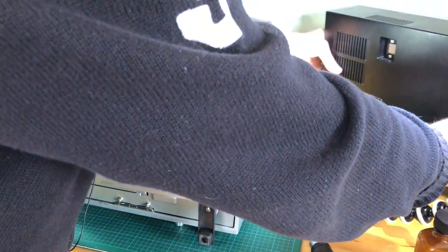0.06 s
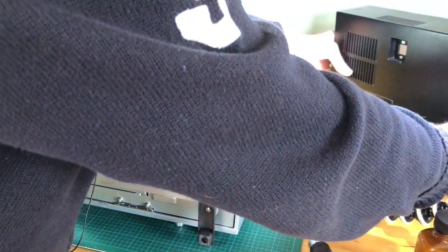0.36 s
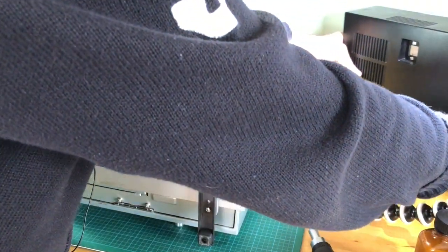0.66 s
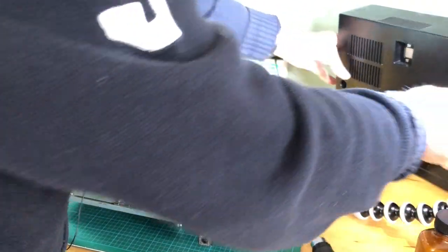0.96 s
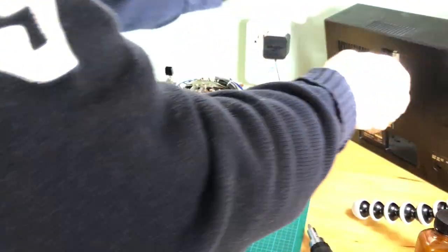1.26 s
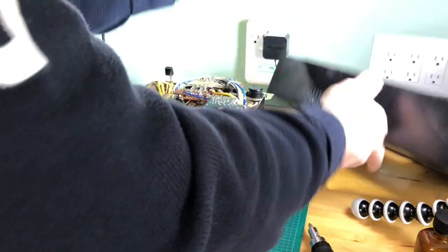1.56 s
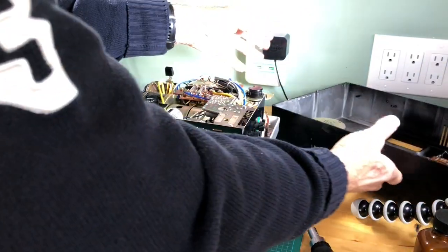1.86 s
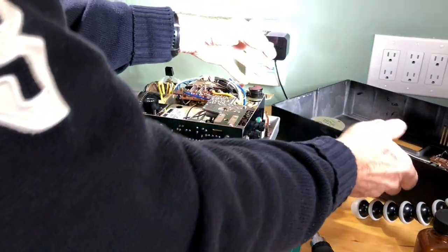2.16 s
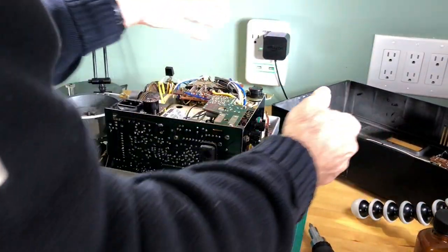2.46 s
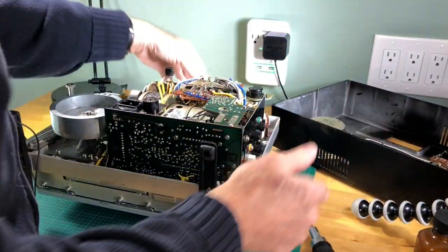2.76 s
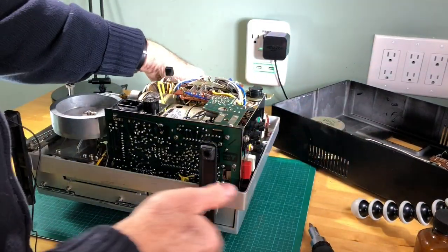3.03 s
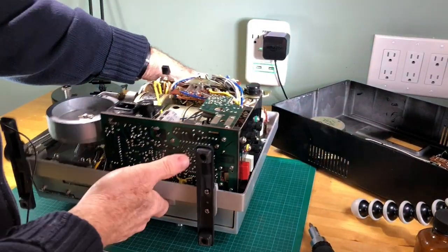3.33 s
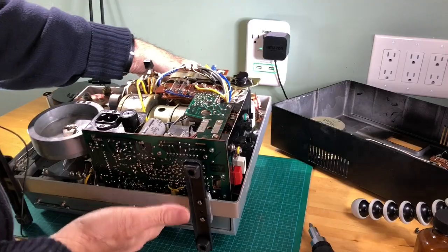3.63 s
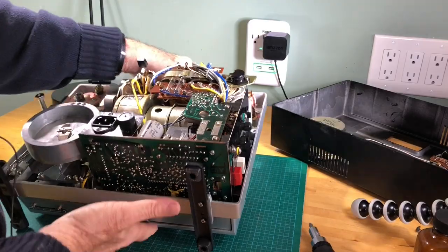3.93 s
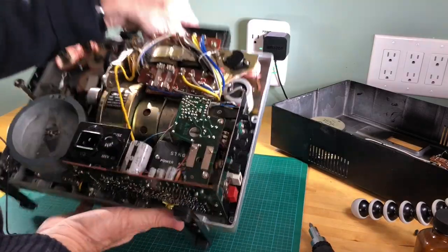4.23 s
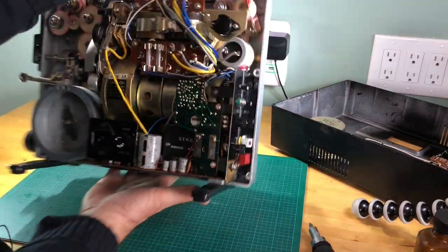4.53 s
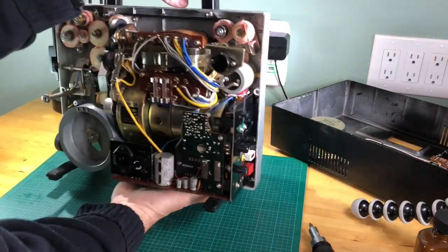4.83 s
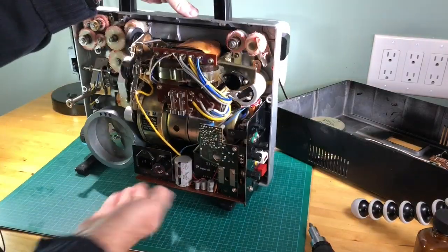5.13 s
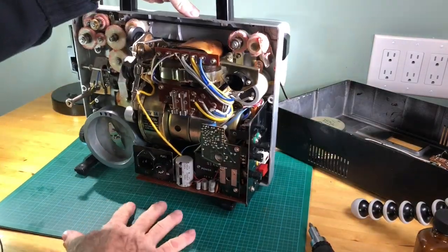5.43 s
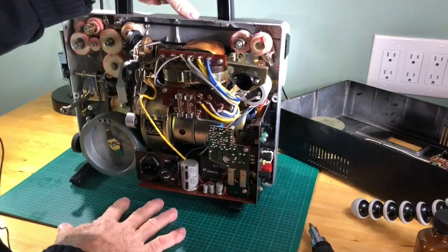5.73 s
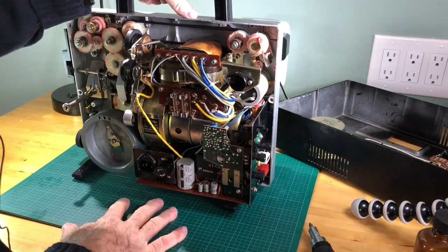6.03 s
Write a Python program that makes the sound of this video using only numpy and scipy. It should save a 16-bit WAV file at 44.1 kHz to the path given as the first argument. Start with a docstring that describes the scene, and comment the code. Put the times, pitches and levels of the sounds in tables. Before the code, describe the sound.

A plastic casing lands loudly on wood, bounces and rattles to rest; then a metal chassis bumps dully on a mat.

```python
"""A hard plastic cover slides off a tape machine and drops on a wooden bench: its panel thuds, its shell
rings, its edges crack, overloading the microphone. It bounces; a loose part hops and rocks to rest.
Then hands rub and tip the heavy chassis up on a cutting mat: dull knocks, snapping fittings, one small
metal ping, creaks as it takes its weight. Faint workroom air throughout."""
import sys
import numpy as np
from scipy import signal
from scipy.fft import rfft, irfft
from scipy.io import wavfile

SR = 44100
rng = np.random.default_rng(int(sys.argv[2]) if len(sys.argv) > 2 else 0)


def dump(signal):
    """Clip the signal to [-1, 1] and save it as 16-bit WAV at the path in sys.argv[1]."""
    limited = np.clip(np.atleast_2d(signal).T, -1, 1)
    pcm = np.round(limited * 32767).astype(np.int16)
    wavfile.write(sys.argv[1], SR, pcm)


N = 268480
TIME_S = np.arange(N) / SR
AGE_S = TIME_S[:SR * 3 // 4]   # since contact

# cover blows: t/s, shell level/dB, thud level/dB, thud f/Hz, edge level/dB
COVER_BLOWS = [ (0.156, -56, -39, 142, -66), (0.973, -34.5, -28, 143, -86), (1.4545, -26, -23.5, 150, -44),
               (1.543, -30, -28, 152, -52.5), (1.589, -23, -32, 128, -60), (1.618, -29, -24, 150, -58),
               (1.699, -18.5, -33, 150, -27), (1.717, -13.5, -17.5, 142, -45.5),
               (1.733, -20, -21.5, 290, -23.5), (1.763, -24, -18.5, 141, -16), (1.769, -8, 4, 142.1, -8),
               (1.789, 1, -11.5, 134, -24), (1.823, -19, -22, 90.4, -31), (1.865, -7.5, -17.5, 170, -31),
               (1.881, -19.5, -8, 182, -31), (1.905, -14.5, -17, 134, -27),
               (1.9241, -9, -14.5, 143.5, -29.5)]
# chassis on the mat: t/s, knock level/dB, thud level/dB, thud f/Hz
CHASSIS_KNOCKS = [ (3.424, -43, -54, 160), (3.465, -40.5, -45, 70), (3.544, -29, -31.5, 158),
                  (4.215, -43, -42, 200), (4.229, -39, -30.5, 88.8), (4.233, -34.5, -30, 165),
                  (4.859, -37, -32, 50.7), (5.07, -29.5, -23, 57), (5.104, -27.5, -28.5, 131),
                  (5.143, -33.5, -25, 88.6), (5.387, -63, -39.5, 285), (5.597, -56, -44.5, 58),
                  (5.799, -49, -39, 58)]

# small contacts: t/s, relative level/dB
LOOSE_PART_HOPS = [(1.9935, -29), (2.0683, -35), (2.1066, -39.5)]
CHASSIS_CREAKS = [(4.935, -45), (4.953, -40), (4.9985, -46), (5.0355, -44), (5.049, -41), (5.070, -36),
                  (5.1435, -42.5)]
METAL_PINGS = [(3.852, -50.5)]
METAL_TICKS = [(0.187, -60.5), (0.708, -61), (1.640, -34), (2.0685, -55), (3.474, -55), (3.489, -50),
               (5.069, -53)]
FITTING_SNAPS = [(0.708, -61), (1.640, -17), (3.265, -59), (3.294, -56), (3.4635, -52), (3.474, -50),
                 (3.5345, -44.5), (3.578, -50), (4.229, -54.5), (4.3725, -60), (4.412, -59),
                 (4.8585, -54.5), (4.871, -49), (5.809, -50)]

# friction strokes: t/s, length/s, level/dB
COVER_SLIDES = [(0, 0.048, -56), (.07, .66, -68.5), (.905, .06, -68.5), (1.47, .11, -51.5),
                (1.58, .11, -48.5)]
HAND_STROKES = [(2.64, .06, -75), (2.81, 0.46, -73), (3.46, .3, -68.5), (4.05, .08, -72), (4.145, .12, -64),
                (4.9, 0.53, -66), (5.07, .11, -54.5), (5.55, 0.098, -65.5), (5.68, .35, -71.5)]
EDGE_SCRAPES = [(1.475, .06, -54)]
SLEEVE_BRUSHES = [(0, 0.024, -53.5), (4.97, 0.13, -66.5), (5.285, .025, -65.5), (5.38, .05, -74)]

# resonances: f/Hz, relative level/dB, t60/s
COVER_MODES = [ (87, -16, .35), (235, -3, .13), (283, 2, .15), (318, -3, .13), (380, -16, .55),
               (420, -10, .17), (470, -1, .19), (528, -5, .33), (651, -9, .16), (697, 0, .18),
               (785, -7, .17), (885, -7, .17), (943, -3, .17), (1060, -10, .2), (1132, -1, .17),
               (1191, -5, .15), (1433, 2, .15), (1507, 1, .14), (1590, -2, .14), (1689, -2, .16),
               (1913, 0, .1), (2368, -1, .1)]
PLATE_MODES = [(343.56, 4.5, 0.69), (850, -4.5, 0.62), (1394.6, -3, 0.894), (1440, -5, 1.3),
               (1758.7, -5, 0.99)]
LOOSE_PART_MODES = [(180, -11, .1), (400, -8, .12), (600, -8, 0.125), (872, -13, .06), (1130, -7, 0.064),
                    (1413, -16, .03), (1644.7, -16, 0.046), (1787.4, -12.5, .035), (2220, -4, 0.015),
                    (2737, 0, 0.01703), (3355, 6.5, .017), (4100, -3, .014), (5000, -2.5, .012),
                    (6300, -5, .02), (6885, -4.5, .014)]
CREAK_MODES = [(1147, -9, .025), (1690, 3, .022), (1836, 6, .022), (1940, 1, .022), (2526, -7, .02)]
PING_MODES = [(1550, 3.5, 0.077), (1578, -14, .06), (2506, -18.5, 0.1292), (3362.4, -12, 0.054),
              (4354, -13, 0.07125)]

# contact spectra: f/Hz, relative density level/dB
SHELL_SPECTRUM = [(60, -18), (270, 3), (600, 2.5), (1000, 2.5), (1500, -2.5), (2400, -2.5), (3500, -8),
                  (6000, -9), (16000, -25.5)]
CRACK_SPECTRUM = [(200, -19), (1500, -5.5), (3500, -6), (5500, -0.5), (8000, -1.5), (10500, -0.5),
                  (12500, -7.5), (16000, -10)]
CHASSIS_SPECTRUM = [(40, 2.5), (120, -10), (190, 4.5), (310, -2), (430, -3.5), (620, -6.5), (1000, -10.5),
                    (1800, -4), (3000, -10.5), (12000, -20)]
SNAP_SPECTRUM = [(150, -15), (700, 0), (1600, 4.5), (2900, 0), (4500, -8.5), (7000, -13.5), (10000, -21.5),
                 (16000, -29.5)]
# friction spectra: f/Hz, relative density level/dB
SLIDE_SPECTRUM = [(200, -25.5), (450, 0.5), (700, 0.5), (1300, -10.5), (1850, -11.5), (2450, -15.5),
                  (4000, -24.5), (9000, -40.5)]
HAND_SPECTRUM = [(200, -25), (480, 2.5), (850, 0), (1050, -2.5), (1400, 0.5), (1750, -4.5), (2100, -10.5),
                 (2800, -9), (4000, -22), (9000, -36)]
RUMBLE_SPECTRUM = [(30, -12.5), (90, -7), (140, 1.5), (220, -8.5), (330, 0), (520, -14.5), (900, -34),
                   (3000, -69.5)]
SWISH_SPECTRUM = [(1500, -25), (3500, -3), (6500, 0), (9000, -3), (15000, -6.5)]
SCRAPE_SPECTRUM = [(1500, -14), (3500, -7), (5500, 0), (8000, -4), (12000, -24), (16000, -36)]
# room spectra: f/Hz, relative density level/dB
ECHO_SPECTRUM = [(40, -19.5), (150, -4.5), (400, 0), (1500, -3), (4000, -1), (8000, -5), (16000, -8)]
AIR_SPECTRUM = [(15, -28), (25, 2.5), (134, -15.5), (242, -21), (326, -19), (503, -29.5), (818, -29),
                (1190, -36), (1480, -30.5), (1700, -34), (3340, -40), (14400, -47.5), (16000, -58.5)]

# friction layers: relative level/dB, spectrum
SLIDE_LAYERS = [(0, SLIDE_SPECTRUM), (6, RUMBLE_SPECTRUM), (-11, SWISH_SPECTRUM)]
HAND_LAYERS = [(0, HAND_SPECTRUM), (1.5, RUMBLE_SPECTRUM), (-13, SWISH_SPECTRUM)]

CUTOFF_HZ = 16000


def cover(panel_t60_s=.158, chatter_s=.017, shell_loss_db=10, edge_loss_db=12):
    """Each blow bends the panel, then chatters, ringing the shell and cracking at the hard edge."""
    ring, clack, crack = np.zeros((3, N))
    shell = mode_shapes(COVER_MODES)
    for t_s, blow_db, thud_db, thud_hz, edge_db in COVER_BLOWS:
        add(ring, t_s, from_db(thud_db) * thud(thud_hz, panel_t60_s))
        add(ring, t_s, from_db(thud_db - 12) * thud(2 * thud_hz, panel_t60_s))
        contact_hz = 1990 * 2 ** (blow_db / 14.5)   # harder is shorter, so brighter
        for touch in range(3):
            shell_db = blow_db - touch * shell_loss_db
            crack_db = edge_db - touch * edge_loss_db
            edge_hz = 16000 * 2 ** ((crack_db + 14.5) / 28)
            struck = strike(shell, spread_db=1.5)
            add(ring, t_s, from_db(shell_db - 8) * soften(struck, contact_hz, order=3))
            add(clack, t_s, from_db(shell_db) * soften(burst(t60_s=.062), contact_hz, order=3))
            add(crack, t_s, from_db(crack_db) * soften(burst(t60_s=.063), edge_hz, order=4))
            t_s += chatter_s * rng.uniform(.8, 1.2)
    return ring + colour(clack, SHELL_SPECTRUM) + colour(crack, CRACK_SPECTRUM)


def chassis(mat_hz=520, damped_above_hz=88, settle_s=.038, settle_loss_db=9):
    """The frame lands dully and settles with a lighter knock; metal plates inside ring on faintly."""
    ring, knocks = np.zeros((2, N))
    plates = mode_shapes(PLATE_MODES)
    for t_s, knock_db, thud_db, thud_hz in CHASSIS_KNOCKS:
        # low thuds ring on in the bench, higher ones die in the mat
        thud_t60_s = .31 * min(1, damped_above_hz / thud_hz) ** 2
        add(ring, t_s, from_db(thud_db) * thud(thud_hz, thud_t60_s))
        add(ring, t_s, from_db(knock_db - 33.5) * strike(plates, spread_db=0))
        add(knocks, t_s, from_db(knock_db) * soften(burst(t60_s=.11), mat_hz))
        settle = soften(burst(t60_s=.095), mat_hz)
        add(knocks, t_s + settle_s, from_db(knock_db - settle_loss_db) * settle)
    return ring + colour(knocks, CHASSIS_SPECTRUM)


def loose_part(start_s=2.149, first_swing_s=.0439, swing_ratio=.863, swing_loss_db=1.6):
    """Hops, then rocks ever faster and weaker; the far corner touches lightly in mid-swing."""
    touches, t_s = [], start_s
    for swing in range(14):
        swing_s = first_swing_s * swing_ratio ** swing
        level_db = -36.5 - swing_loss_db * swing
        far_corner_s = t_s + swing_s * rng.uniform(.2, .55)
        touches += [(t_s, level_db), (far_corner_s, level_db - 4.5)]
        t_s += swing_s
    return taps(LOOSE_PART_HOPS + touches, LOOSE_PART_MODES, ring_db=-6, snap_db=-6)


def fittings(shift_start_s=3.2, shift_end_s=6.0, shifts_per_s=8):
    """Small parts creak, ping, tick and snap; they shift faintly at random while the chassis moves."""
    creaks = taps(CHASSIS_CREAKS, CREAK_MODES, ring_db=-4, snap_db=-11)
    ping = taps(METAL_PINGS, PING_MODES, ring_db=-2.5, snap_db=-15)
    ticks = clicks(METAL_TICKS, CRACK_SPECTRUM, t60_s=.031)
    shifts = []
    for slot_s in np.arange(shift_start_s, shift_end_s, 1 / shifts_per_s):
        t_s = min(slot_s + rng.random() / shifts_per_s, shift_end_s)
        shifts.append((t_s, rng.normal(-69.5, 2)))
    snaps = clicks(FITTING_SNAPS + shifts, SNAP_SPECTRUM, t60_s=.021)
    return creaks + ping + ticks + snaps


def friction():
    """The cover slides, hands rub the frame, the cover's edge scrapes, a sleeve brushes past."""
    slide = rubbing(COVER_SLIDES, SLIDE_LAYERS, grain_db=1.5)
    hands = rubbing(HAND_STROKES, HAND_LAYERS, grain_db=2.5)
    edge = rubbing(EDGE_SCRAPES, [(0, SCRAPE_SPECTRUM)], grain_db=2.5)
    sleeve = rubbing(SLEEVE_BRUSHES, [(0, SWISH_SPECTRUM)], grain_db=2)
    return slide + hands + edge + sleeve


def rubbing(strokes, layers, grain_db, grain_hz=220, attack_s=.012, release_t60_s=.17):
    """Strokes grip, hold and fade; friction catches and lets go. One force drives all noise layers."""
    force = np.zeros(N)
    for t_s, length_s, level_db in strokes:
        rise = np.clip((TIME_S - t_s) / attack_s, 0, 1)
        fade = decay(release_t60_s, np.maximum(TIME_S - t_s - length_s, 0))
        force = np.maximum(force, from_db(level_db) * rise * fade)
    knots = rng.standard_normal(N // 20)
    grain = np.interp(TIME_S * grain_hz, np.arange(len(knots)), knots)
    force *= from_db(grain_db * grain)
    return sum(from_db(db) * colour(force * rng.standard_normal(N), spectrum) for db, spectrum in layers)


def taps(events, modes, ring_db, snap_db):
    """A part touches at one spot: the same ring each time, with a fresh snap."""
    ring = np.zeros(N)
    tap = from_db(ring_db) * strike(mode_shapes(modes), spread_db=1)
    for t_s, level_db in events:
        add(ring, t_s, from_db(level_db) * tap)
    return ring + from_db(snap_db) * clicks(events, SNAP_SPECTRUM, t60_s=.024)


def clicks(events, spectrum, t60_s):
    """Short, dry contacts."""
    track = np.zeros(N)
    for t_s, level_db in events:
        add(track, t_s, from_db(level_db) * burst(t60_s))
    return colour(track, spectrum)


def thud(f_hz, t60_s):
    """One low mode, pushed by a blunt contact."""
    return soften(-np.sin(2 * np.pi * f_hz * AGE_S) * decay(t60_s), 3 * f_hz)


def burst(t60_s):
    """Modes too crowded to tell apart: decaying noise."""
    age_s = AGE_S[:len(AGE_S) // 3]
    return rng.standard_normal(len(age_s)) * decay(t60_s, age_s)


def mode_shapes(modes):
    """One decaying sine a row; unit total power at onset."""
    shapes = [from_db(db) * np.sin(2 * np.pi * f_hz * AGE_S) * decay(t60_s) for f_hz, db, t60_s in modes]
    power = np.sum(from_db(np.array(modes)[:, 1]) ** 2) / 2
    return np.array(shapes) / np.sqrt(power)


def strike(shapes, spread_db):
    """Each contact point excites the modes with its own strengths and signs."""
    strengths = from_db(rng.normal(0, spread_db, len(shapes)))
    signs = rng.choice([-1, 1], len(shapes))
    return (strengths * signs) @ shapes


def soften(x, corner_hz, order=2):
    """Low-pass of a soft contact."""
    return signal.sosfilt(signal.butter(order, min(corner_hz, CUTOFF_HZ), fs=SR, output="sos"), x)


def colour(x, spectrum, size=4096):
    """Minimum-phase filter; white noise keeps its power."""
    f_hz, level_db = np.transpose(spectrum)
    bins_hz = np.arange(size // 2 + 1) * SR / size
    gain = from_db(np.interp(np.log(bins_hz + 1), np.log(f_hz), level_db))
    gain /= np.sqrt(np.mean(gain ** 2))
    cepstrum = irfft(np.log(gain))
    cepstrum[1:size // 2] *= 2
    cepstrum[size // 2 + 1:] = 0
    impulse = irfft(np.exp(rfft(cepstrum)))
    return signal.oaconvolve(x, impulse)[:len(x)]


def decay(t60_s, age_s=AGE_S):
    """Falls 60 dB in t60_s."""
    return np.exp(-np.log(1000) * age_s / t60_s)


def from_db(level_db):
    """Decibels to gain."""
    return 10 ** (np.asarray(level_db) / 20)


def add(track, t_s, sound):
    """Mix a sound in at t_s."""
    start = max(round(t_s * SR), 0)
    track[start:start + len(sound)] += sound[:N - start]


def workroom(direct, gap_s=.004):
    """Close reflections from bench and wall, then a short diffuse tail."""
    early = from_db(-43.5) * decay(t60_s=.13)
    late = from_db(-48) * decay(t60_s=.48)
    echoes = rng.standard_normal(len(AGE_S)) * (early + late) * (AGE_S > gap_s)
    return direct + signal.fftconvolve(direct, colour(echoes, ECHO_SPECTRUM))[:N]


def room_air(level_db=-63.5):
    """Steady, low noise of the still room."""
    return from_db(level_db) * colour(rng.standard_normal(N), AIR_SPECTRUM)


def scene():
    """Contacts and friction in the room, over its air; mono."""
    air = room_air()
    direct = cover() + chassis() + friction() + loose_part() + fittings()
    return (workroom(direct) + air)[None]


def record(dry):
    """Microphone overload flattens the peaks; a low-pass cuts the top."""
    ceiling = .73
    clipped = dry / (1 + (dry / ceiling) ** 6) ** (1 / 6)
    low_pass = signal.firwin(161, CUTOFF_HZ, fs=SR, window="blackman")
    return signal.oaconvolve(clipped, low_pass[None], mode="same")


dry = scene()
out = record(dry)
dump(out)
```